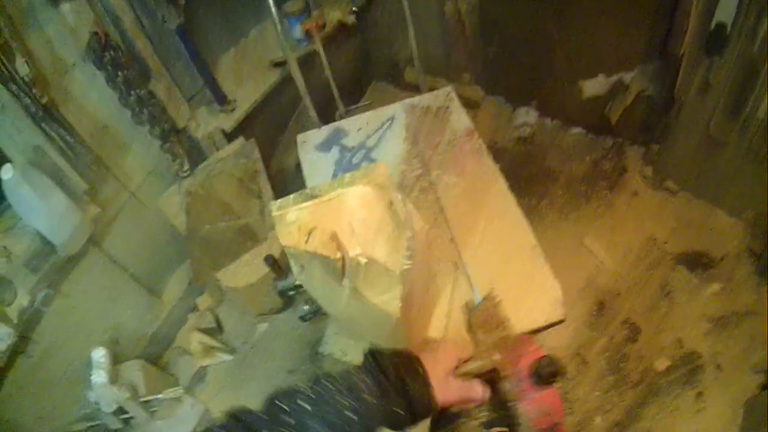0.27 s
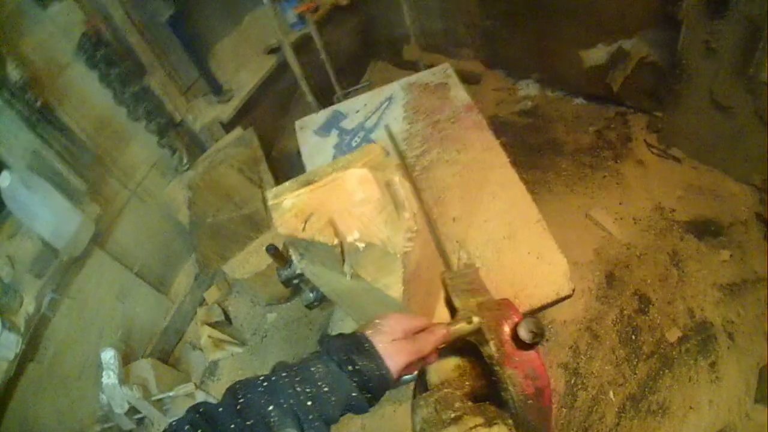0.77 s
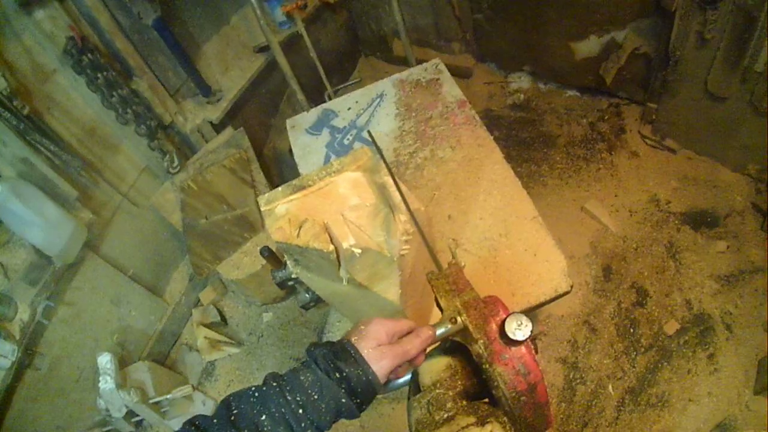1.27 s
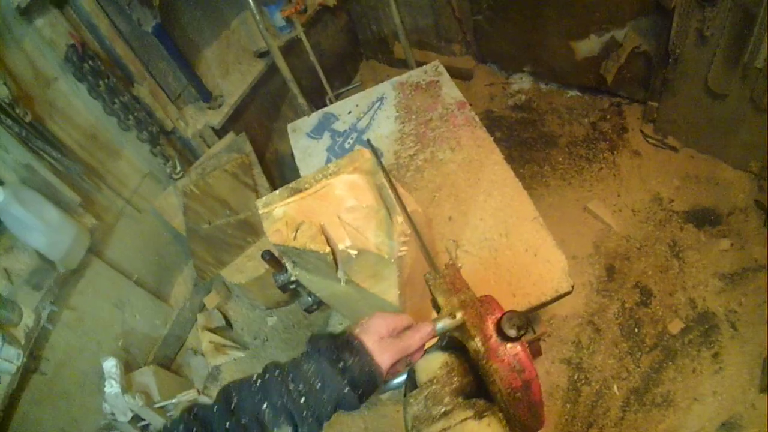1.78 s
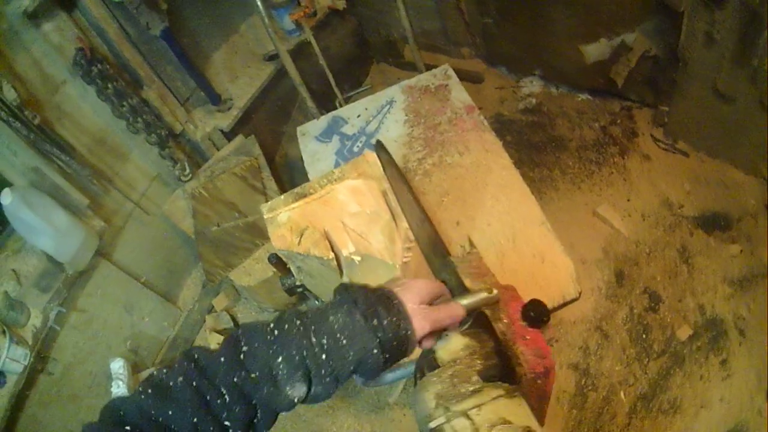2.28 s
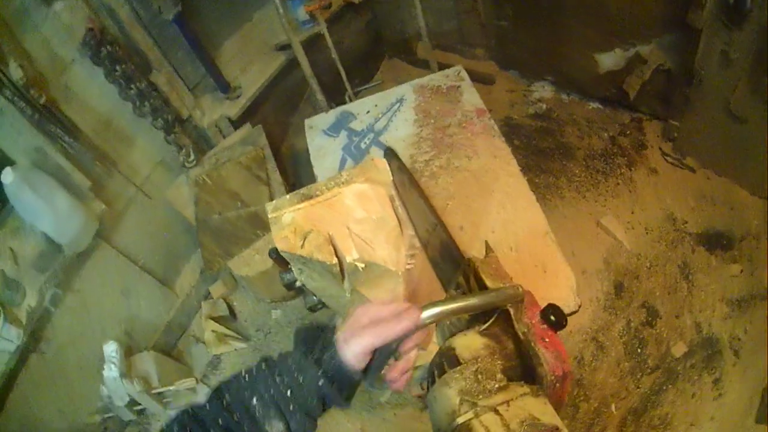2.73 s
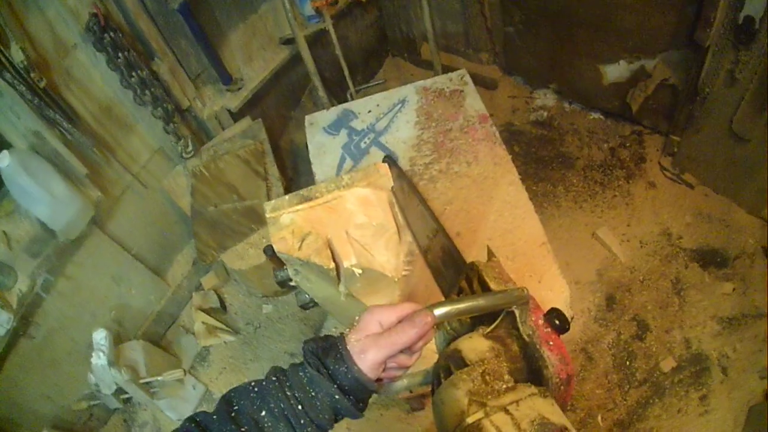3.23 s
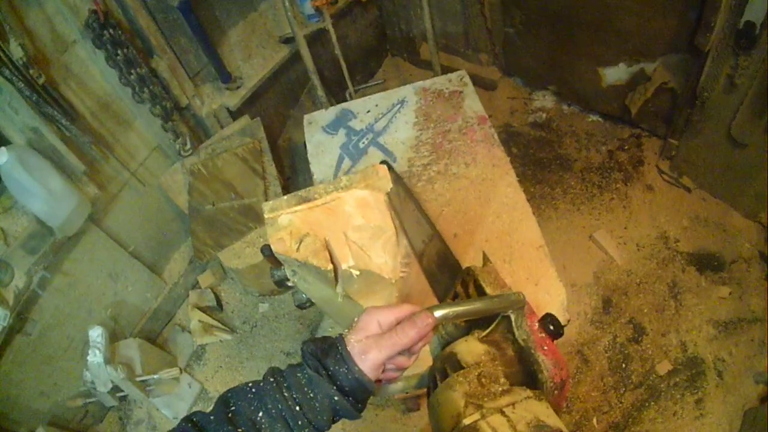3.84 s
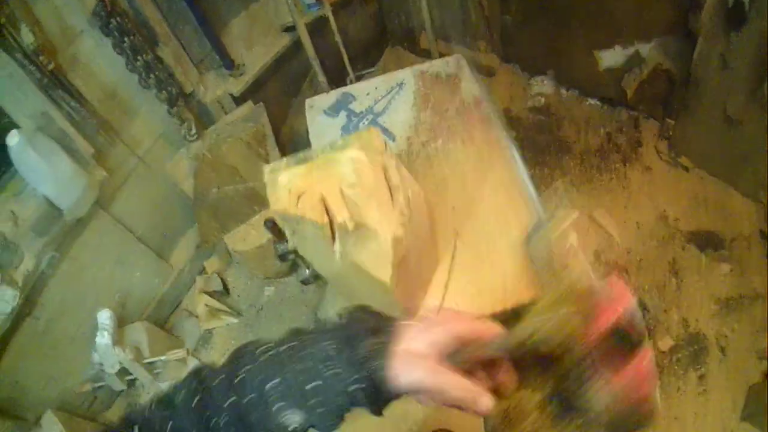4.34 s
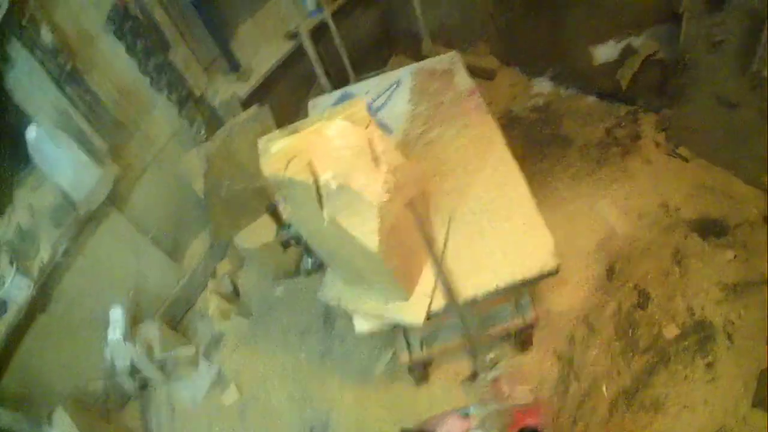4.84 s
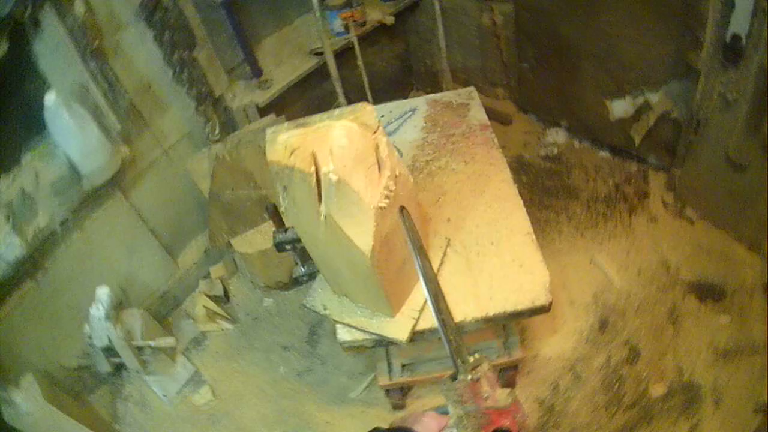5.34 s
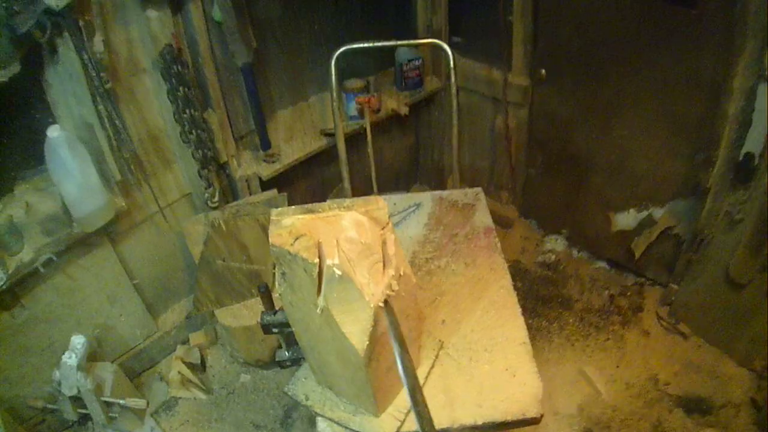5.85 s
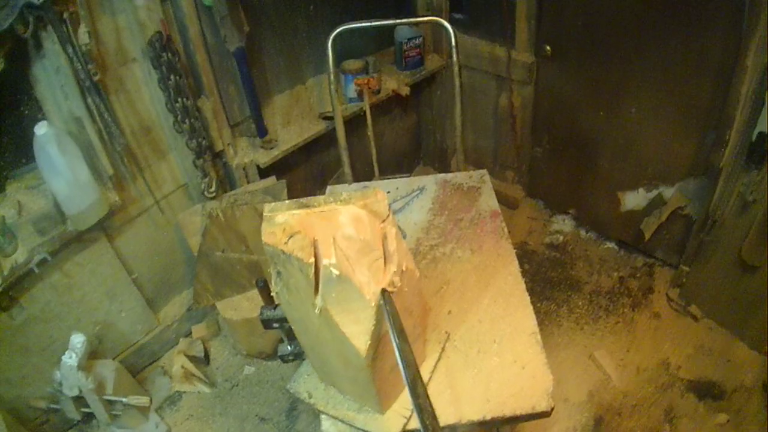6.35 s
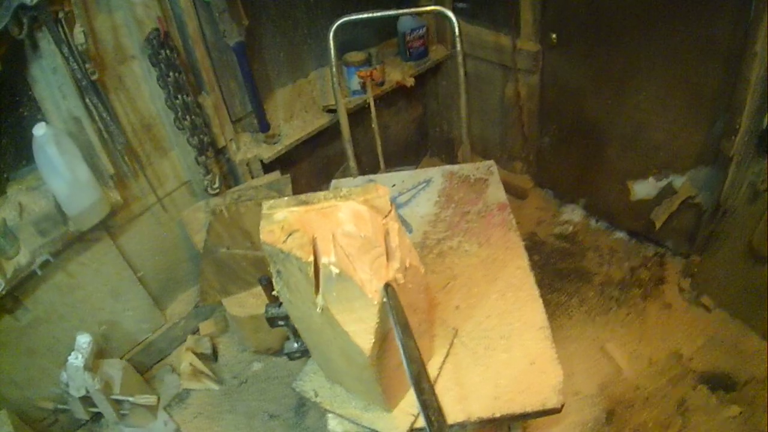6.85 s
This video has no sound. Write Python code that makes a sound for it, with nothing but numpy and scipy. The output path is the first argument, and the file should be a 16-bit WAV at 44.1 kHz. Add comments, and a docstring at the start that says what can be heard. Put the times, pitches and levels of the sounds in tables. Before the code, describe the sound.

An electric chainsaw is already running at the start, heard from just above it in a small shed with a short, tight echo. The motor gives a hum and a high whine, the chain rattles around its bar, and cooling air hisses. The pitch dips briefly between 0.4 and 1.1 seconds. From about 1.5 to 4 seconds the teeth tear harder into a wooden block, with a buzzing, ringing clatter and short rasps near 3.7 seconds. At 4.1 seconds the saw starts coasting down, grazing the wood again around 4.4 seconds, then falling in pitch and growing quieter. At 5.8 seconds it winds up again, nearing full speed by 7 seconds with the loose chain singing. Thin, dry ticks repeat about five times a second almost throughout, some faint and some sharp.

```python
"""Electric chainsaw in a shed

A chainsaw trims a block of wood in a small shed, heard from just above the saw.
The motor hums and whines, the chain rattles round its bar and the cutters tear the wood.
Cooling air hisses, and dry ticks keep a steady beat. The trigger is eased at 0.4 s
and let go at 4.1 s: the saw coasts down, then winds up again from 5.8 s."""
import sys
import numpy as np
from scipy import signal
from scipy.fft import rfft, irfft, next_fast_len
from scipy.io import wavfile

SR = 44100
rng = np.random.default_rng(int(sys.argv[2]) if len(sys.argv) > 2 else 0)


def persist_wave(psi):
    """Save psi, clipped to +-1, as 16-bit WAV."""
    counts = np.round(np.clip(psi, -1, 1) * 32767).astype(np.int16)
    wavfile.write(sys.argv[1], SR, np.atleast_2d(counts).T)


N = 313551
TIME = np.arange(N) / SR


def from_db(db):
    """Turn decibels into a number to multiply a sound by."""
    return 10 ** (np.asarray(db) / 20)


def unit_level(x):
    """Scale a signal so that its average size (rms) is 1."""
    return x / np.sqrt(np.mean(x ** 2) + 1e-20)


def curve(rows):
    """Join (time, value) points with straight lines, giving a value for every sample."""
    return np.interp(TIME, *np.transpose(rows))


def spells(rows, rest_db=0, fade_s=0.1):
    """A level in dB that rests, then fades to each row's level from its start to its end."""
    level_db = rest_db
    for start, end, db in rows:
        inside_s = np.minimum(TIME - start, end - TIME)
        level_db += (db - rest_db) * np.clip(.5 + inside_s / fade_s, 0, 1)
    return level_db


def drift(rate_hz):
    """A smooth random wobble of size about 1, made by smoothing noise twice."""
    step = 40  # samples between random values
    r = np.exp(-2 * np.pi * step * rate_hz / SR)
    slow = signal.lfilter([1], [1, -2 * r, r * r], rng.standard_normal(N // step + 2002))[2000:]
    return np.interp(np.arange(N) / step, np.arange(len(slow)), unit_level(slow))


def let_through(x, kind, hz, order):
    """Keep what lies above one pitch ("high") or between two ("band"); more order cuts harder."""
    return signal.sosfilt(signal.butter(order, hz, kind, fs=SR, output="sos"), x)


def colour(x, spectrum):
    """Make some pitches stronger than others, following (pitch_hz, level_db) points."""
    size = next_fast_len(N)
    hz, db = np.transpose(spectrum)
    bin_hz = np.maximum(np.arange(size // 2 + 1) * SR / size, 1)
    gain = from_db(np.interp(np.log(bin_hz), np.log(hz), db))
    return unit_level(irfft(rfft(x, size) * gain, size)[:N])


def resonate(x, rings):
    """Let a sound ring an object at its own pitches; a narrower ring lasts longer."""
    out = np.zeros(N)
    for k, (hz, width, db) in enumerate(rings):
        r = np.exp(-np.pi * width / SR)
        poles = [1, -2 * r * np.cos(2 * np.pi * hz / SR), r * r]
        out += (-1) ** k * from_db(db) * (1 - r * r) / 2 * signal.lfilter([1, 0, -1], poles, x)
    return unit_level(out)


def bursts(count, fade, uneven_db):
    """One burst of noise each time the count passes a whole number, each with its own strength."""
    which = count.astype(int)
    strength = from_db(uneven_db * np.clip(rng.standard_normal(N), -2, 2))[which]
    return unit_level(strength * np.exp(-fade * (count - which)) * rng.standard_normal(N))


def tone(cycles, flutter, flutter_hz):
    """A single tone whose strength and timing tremble."""
    wobble = 1 + flutter * (drift(flutter_hz) + 1j * drift(flutter_hz))
    return np.real(wobble * np.exp(2j * np.pi * cycles)) / np.sqrt(.5 + flutter ** 2)


FULL_TURNS_PER_S, LINKS_PER_TURN = 380, .52
# How fast the motor spins. Columns: time_s, turns_per_s
MOTOR_SPEED = [(0.0, 376.0), (0.39, 384.3), (0.75, 349.8), (1.1, 369.0), (1.35, 376.0), (1.8, 376.6),
               (2.1, 379.6), (2.68, 379.4), (3.0, 373.4), (3.35, 371.5), (4.0, 360.3), (4.13, 364.0),
               (4.4, 337.6), (5.0, 293.2), (5.4, 267.0), (5.79, 244.5), (5.92, 277.0), (6.1, 308.2),
               (6.45, 344.8), (6.8, 363.4), (7.11, 369.6)]
def motor_speed():
    """The motor's turns per second at every moment."""
    return curve(MOTOR_SPEED)


def halvings():
    """How far the motor has slowed: 0 at full speed, 1 at half speed."""
    return np.log2(FULL_TURNS_PER_S / motor_speed())


# How hard the chain presses into the wood. Columns: time_s, load (0 to 1)
LOAD = [(0, 0.35), (0.25, 0.079), (0.45, 0.47), (0.65, 0.24), (1.2, 0.37), (1.62, 0.78), (1.95, 0.24),
        (2.12, 0.76), (2.32, .5), (2.85, .85), (3.12, 0.72), (3.75, 1), (4.2, 0.38), (4.55, 0.27),
        (5.8, 0.097), (7.11, .15)]
# The saw is drawn back from the listener, then returns. Columns: time_s, change_db
NEARNESS = [(0, 0), (4.25, 0.5), (4.48, 1.3), (4.72, -1.5), (5.7, -3.1), (6.3, -2.5), (7.11, 0.5)]
def part_level_db(base_db, halving_db, load_db):
    """A part's level: it drops as the saw slows or moves away, and changes with the load."""
    return base_db - halving_db * halvings() + load_db * curve(LOAD) + curve(NEARNESS)


# The hum carries less well from the drawn-back saw and fades when slowest. Columns: time_s, change_db
HUM_DIPS = [(0, -0.5), (1.6, 0), (4.0, -2), (4.38, -0.5), (4.88, -6), (5.45, -6.5), (5.63, -22), (5.8, -14),
            (5.98, -9.5), (6.35, .5), (6.7, -5.5), (7.11, -5)]
# How the whine swells and fades. Columns: time_s, level_db
WHINE_LEVELS = [(0, -37), (0.15, -38.5), (0.25, -44.5), (0.4, -34), (0.75, -37.5), (1.2, -34.5),
                (1.95, -39), (2.17, -33), (2.45, -51), (2.7, -42), (3.38, -28.5), (3.7, -38.5), (3.86, -32),
                (4.28, -32), (4.5, -44), (5.17, -56.5), (5.33, -42.5), (5.82, -44), (6.1, -52), (6.35, -44),
                (6.7, -40.5), (7.11, -45)]
def motor(turns, slots=12):
    """The slightly lopsided rotor hums once a turn; the slots around it make a high whine."""
    hum_db = part_level_db(base_db=-26.5, halving_db=20.8, load_db=-2)
    hum_db += curve(HUM_DIPS) + 0.05 * drift(rate_hz=4)
    # A slow motor whines more weakly and less steadily.
    slowness = np.maximum(1 - motor_speed() / FULL_TURNS_PER_S, 0)
    flicker_db = (1.2 + 3.7 * halvings()) * drift(rate_hz=9.1)
    whine_db = curve(WHINE_LEVELS) + flicker_db + .8 - 4 * slowness
    hum = from_db(hum_db) * tone(turns, flutter=0.065, flutter_hz=16)
    whine = from_db(whine_db) * tone(slots * turns, flutter=.14 + 1.4 * slowness, flutter_hz=35)
    # The small housing hardly gives out the hum at its lowest pitch.
    return let_through(hum, "high", hz=260, order=8) + whine


# The tones of links meeting the drive wheel. Columns: cycles_per_link, level_db
SPROCKET_TONES = [(4, 1), (8, -7.5), (9, -12.5), (12, -13), (13, -17), (16, -16.5)]
# How those tones swell and fade together. Columns: time_s, level_db
SPROCKET_LEVELS = [(0, -39), (0.55, -37), (0.73, -45.5), (1.25, -35), (1.8, -34.5), (2.02, -39.5),
                   (2.55, -37.5), (3.08, -30.5), (3.45, -31.5), (4.05, -41.5), (4.8, -45), (5.2, -62),
                   (5.77, -46), (6.05, -52), (6.38, -40), (7.11, -36)]
def sprocket(links):
    """Links strike the toothed drive wheel evenly, making tones; the weak ones waver most."""
    out = np.zeros(N)
    for cycles_per_link, db in SPROCKET_TONES:
        flutter = .16 if db > -6 else .6
        out += from_db(db) * tone(cycles_per_link * links, flutter, flutter_hz=7.8)
    return from_db(curve(SPROCKET_LEVELS)) * out


# Where the saw's housing rings. Columns: pitch_hz, width_hz, level_db
HOUSING_RINGS = [(489, 51, -11), (718, 63, -12), (1108, 63, -8.5), (1283.5, 69, -2), (1372, 190, -5.5),
                 (1591, 108, -2.5), (1696, 44.5, -0.5), (1765, 53, -1.5), (1955, 123, -6.5),
                 (2106, 75, -6.5), (2346, 210, -10.5)]
# The chain's broad clatter. Columns: pitch_hz, level_db
CLATTER_COLOUR = [(30, -54), (90, -41), (170, -21.5), (250, -22.5), (400, -8.5), (480, -8), (580, -14.5),
                  (750, -5.5), (950, -6), (1300, -5.5), (1750, -2), (2250, -5), (2900, -5), (3500, -11.5),
                  (6000, -41)]
# Where the steel bar that guides the chain rings. Columns: pitch_hz, width_hz, level_db
BAR_RINGS = [(2553, 145, -3), (2692, 62, 0), (2781, 60, -0.5), (2948, 110, -5), (3113, 160, -11)]
# The bar rings louder in the cut. Columns: start_s, end_s, added_db
BAR_SWELLS = [(0.37, 0.53, 1.5), (1.77, 1.93, 3.5), (2.9, 3.04, 2.5), (3.33, 3.84, 3.5)]
def chain_rattle(links):
    """Links knock on the wheel and bar; the loose chain flaps, so the knocks come in uneven clumps."""
    rattle_db = part_level_db(base_db=-29.5, halving_db=7.6, load_db=3.27)
    bar_db = part_level_db(base_db=-32.8, halving_db=7.9, load_db=3.1)
    bar_db += spells(BAR_SWELLS) + 0.3 * drift(rate_hz=7)
    flap = from_db(.55 * drift(rate_hz=70))
    knocks = np.abs(links + .18 * drift(rate_hz=40))
    housing = resonate(flap * bursts(knocks, fade=.6, uneven_db=1.0), HOUSING_RINGS)
    clatter = colour(flap * bursts(knocks, fade=.6, uneven_db=1.5), CLATTER_COLOUR)
    bar = resonate(flap * bursts(knocks, fade=0.46, uneven_db=1.0), BAR_RINGS)
    rings = from_db(rattle_db) * housing + from_db(bar_db) * bar
    rings = let_through(rings, "band", hz=[300, 4200], order=2)  # small parts give little bass
    return rings + from_db(rattle_db - 2.5) * clatter


# Where the block and its stand ring. Columns: pitch_hz, width_hz, level_db
BLOCK_RINGS = [(208, 10, -28.5), (294.6, 15, -5), (490, 47, -7.5), (539, 42, 1), (614, 63, 2),
               (705, 57, -8)]
# The sound of chips spraying against the cover. Columns: pitch_hz, width_hz, level_db
CHIP_RINGS = [(3946, 110, 0), (4500, 340, -1)]
def cutters(links):
    """Every second link has a tooth that tears off a chip, shakes the block and flings the chip out."""
    cutting_db = part_level_db(base_db=-46.5, halving_db=7.5, load_db=10.9)
    cutting_db += drift(rate_hz=3.4)  # a hand-held saw never presses evenly
    teeth = links / 2
    thud = resonate(bursts(teeth, fade=0.34, uneven_db=-1.6), BLOCK_RINGS)
    thud = let_through(thud, "band", hz=[170, 1100], order=3)
    spray = resonate(bursts(teeth, fade=0.35, uneven_db=4.5), CHIP_RINGS)
    spray = let_through(spray, "band", hz=[3300, 5000], order=2)
    return from_db(cutting_db) * unit_level(thud) + from_db(cutting_db - .5) * unit_level(spray)


# Fan air and the chink of the links. Columns: pitch_hz, level_db
HISS_COLOUR = [(1000, -20), (3000, -8), (3600, -7), (4000, -2), (4450, -2), (4850, 1), (5150, -2),
               (5500, -12), (5850, -18), (6300, -34)]
def air_hiss(links):
    """Cooling air rushes out and the passing links chink in it."""
    hiss_db = part_level_db(base_db=-39.5, halving_db=8.1, load_db=4.5) + 0.66 * drift(rate_hz=3.4)
    return from_db(hiss_db) * colour(bursts(links, fade=0.33, uneven_db=1.26), HISS_COLOUR)


# The pressed block buzzes louder. Columns: start_s, end_s, level_db (at full speed)
BLOCK_BUZZES = [(1.38, 1.86, -55.5), (3.7, 4.05, -58.5)]
# The chain runs slack and sings louder. Columns: start_s, end_s, level_db (at full speed)
SLACK_SPELLS = [(1.75, 3.7, -45), (4.3, 4.43, -35), (6.5, 6.75, -41.5), (6.75, 7.1, -33.5)]
def wood_and_chain_buzz(links, halving_db=19.5):
    """Pressed wood buzzes once per link and a free chain sings six times as fast; slowing fades both."""
    slowing_db = halving_db * halvings()
    block_db = spells(BLOCK_BUZZES, rest_db=-70) - slowing_db
    slack_db = spells(SLACK_SPELLS, rest_db=-49) - slowing_db
    block = from_db(block_db) * tone(links, flutter=0.42, flutter_hz=13)
    slack = from_db(slack_db) * tone(6 * links, flutter=0.25, flutter_hz=5.4)
    return block + slack


# The low background of the shed. Columns: pitch_hz, level_db
RUMBLE_COLOUR = [(10, -8), (38, 0), (60, -5), (120, -4), (400, -16), (2000, -45)]
def shed_rumble(level_db=-75):
    """A very faint, steady rumble lies under the saw."""
    return from_db(level_db) * colour(rng.standard_normal(N), RUMBLE_COLOUR)


def shed_echo(x, fade_60_db_s=0.13, echo_db=-9.5):
    """Close, cluttered walls add a short, dense echo."""
    t = TIME[:SR // 3]
    tail = rng.standard_normal(len(t)) * np.exp(-np.log(1000) * t / fade_60_db_s)
    tail *= t > .004  # the first bounce takes 4 ms
    echo = signal.fftconvolve(x, tail / np.linalg.norm(tail))[:N]
    gain = from_db(echo_db)
    return (x + gain * echo) / np.hypot(1, gain)


# The teeth catch or graze the wood. Columns: middle_s, spread_s, level_db, pitch_hz, width_hz
GRAZES = [(0.08, 0.046, -37.5, 493, 45), (3.66, 0.023, -26.5, 2700, 249), (3.835, 0.018, -27.5, 3000, 400),
          (4.364, 0.038, -29, 2600, 545), (4.446, 0.045, -27, 1730, 546), (4.46, 0.012, -31, 4450, 550)]
def grazes():
    """A short, pitched rasp swells and fades wherever the teeth catch."""
    out = np.zeros(N)
    for middle_s, spread_s, db, hz, width in GRAZES:
        ring = [(hz, width, 0)]
        rasp = resonate(resonate(rng.standard_normal(N), ring), ring)
        swell = np.exp(-.5 * ((TIME - middle_s) / spread_s) ** 2)
        out += from_db(db) * swell * rasp
    return out


# Three runs of dry ticks. Columns: start_s, end_s
TICK_RUNS = [(0.1927, 1.45), (1.55, 4.8), (4.916, 7.0)]
# The ticks that stand out. Columns: time_s, level_db (before the boost)
LOUD_TICKS = [(0.1911, -32), (0.3922, -30.5), (0.7943, -27.5), (0.9953, -35.5), (1.548, -37), (1.7491, -27),
              (1.9501, -32), (2.1512, -37), (2.3517, -34), (2.5528, -38), (2.9548, -29.5), (3.1559, -31),
              (3.3569, -29), (3.558, -34), (3.9601, -39.5), (4.1611, -36), (4.3621, -36.5), (4.9149, -40),
              (5.7186, -38.5), (6.1206, -42.5), (6.7238, -39.5), (6.9248, -37)]
def ticks(gap_s=.2009, faint_db=-49.5, spread_db=4, boost_db=10.5):
    """Sharp, thin clicks on a steady beat, some faint and some loud."""
    beats = np.concatenate([np.arange(start, end, gap_s) for start, end in TICK_RUNS])
    db = faint_db + spread_db * rng.standard_normal(len(beats))
    for time_s, loud_db in LOUD_TICKS:
        nearest = np.argmin(np.abs(beats - time_s))
        db[nearest] = loud_db
    clicks = np.zeros(N)
    clicks[np.round(beats * SR).astype(int)] = from_db(db + boost_db)
    thin = let_through(clicks + 1e-18, "high", hz=500, order=1)
    return signal.lfilter([1], [1, -.4], thin + 1e-18)  # soften the edge a little


def scene():
    """One motor drives the whole saw, so its tones and rattles rise and fall together."""
    turns = np.cumsum(motor_speed()) / SR  # turns made so far
    links = LINKS_PER_TURN * turns  # chain links passed so far
    tones = motor(turns) + sprocket(links) + wood_and_chain_buzz(links)
    noise = chain_rattle(links) + cutters(links) + air_hiss(links) + grazes()
    noise = let_through(noise, "high", hz=130, order=2)  # the saw is too small for deep bass
    return (tones + shed_echo(noise) + shed_rumble())[None]


def record(dry, microphone_top_hz=5820, cutoff_hz=15900, offset=.0022):
    """The microphone dulls the saw; ticks and a tiny constant are added, then the top treble is cut."""
    microphone = signal.cheby1(10, .1, microphone_top_hz, fs=SR, output="sos")
    treble_cut = signal.ellip(10, .2, 80, cutoff_hz, fs=SR, output="sos")
    dull = signal.sosfilt(microphone, dry)
    return signal.sosfilt(treble_cut, dull + ticks() + offset)


dry = scene()
out = record(dry)
persist_wave(out)
```